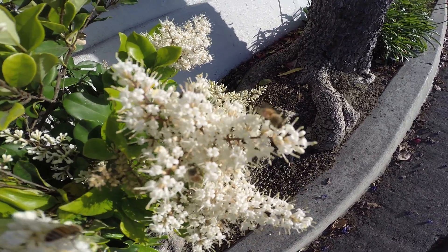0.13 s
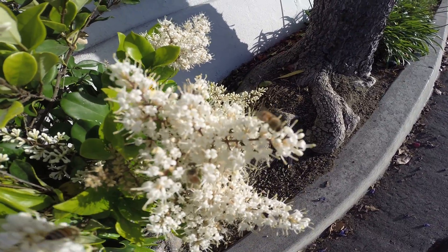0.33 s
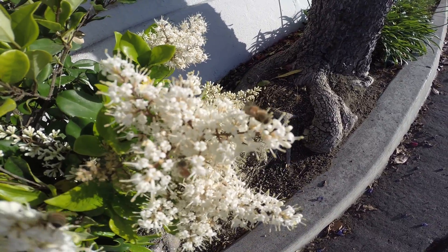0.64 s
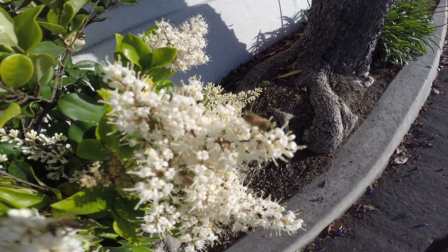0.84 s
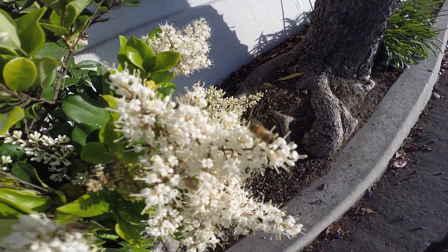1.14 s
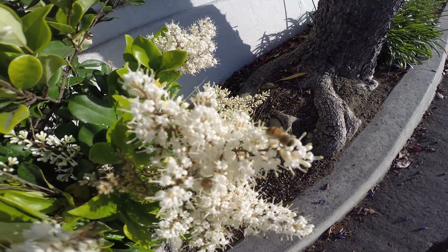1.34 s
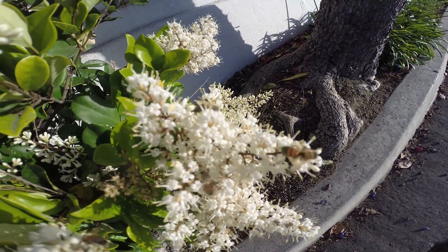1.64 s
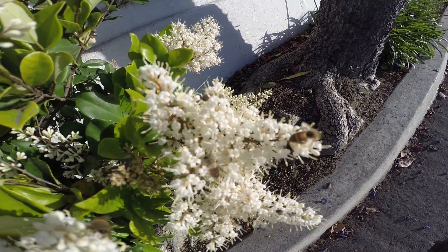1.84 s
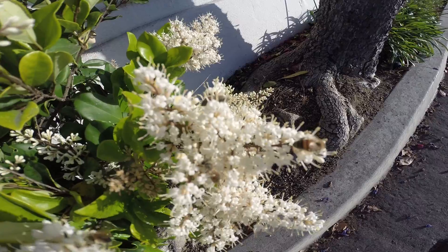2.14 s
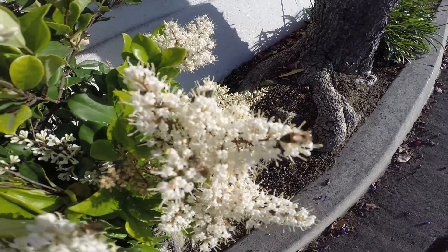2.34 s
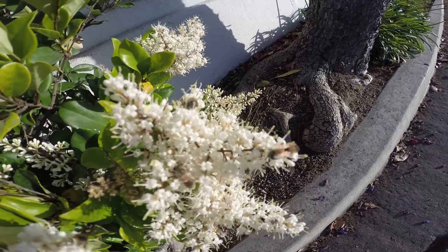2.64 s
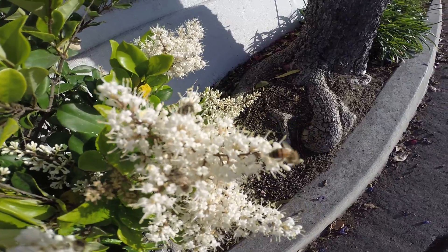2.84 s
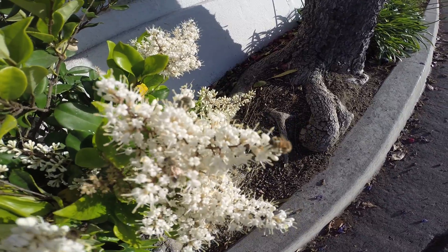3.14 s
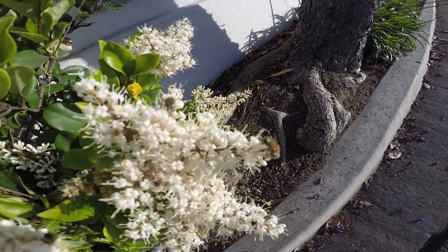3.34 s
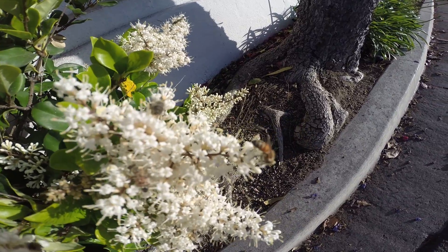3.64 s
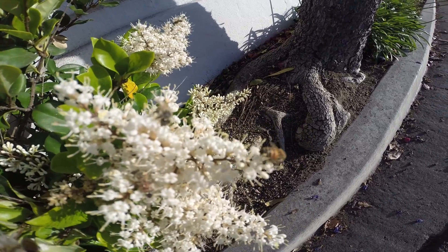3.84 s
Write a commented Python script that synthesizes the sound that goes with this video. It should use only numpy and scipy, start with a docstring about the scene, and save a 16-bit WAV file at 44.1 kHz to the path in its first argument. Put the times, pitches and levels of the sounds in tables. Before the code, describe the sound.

Wind buffets the microphone in low fluttering gusts outdoors, easing to let a faint bird chirp.

```python
"""Wind: a light, gusty breeze rolls eddies over a microphone port beside a flowering bush.
Each eddy is a soft push and pull of pressure; a low, slow swell of noise lies under them.
A quiet outdoor hush is shaped noise. Leaves rustle as grainy noise and twigs tick as short noise bursts.
Bees buzz as stacks of wingbeat harmonics, and a small far-off bird sings gliding, echoing whistles."""
import sys
import numpy as np
from scipy import signal
from scipy.fft import rfft, irfft
from scipy.io import wavfile

SR = 44100
rng = np.random.default_rng(int(sys.argv[2]) if len(sys.argv) > 2 else 0)


def log_audio(samples):
    """Write samples as a 16-bit WAV file to the path given in sys.argv[1]."""
    # one column per channel
    frames = np.atleast_2d(samples).T
    # limit to full scale, then quantise
    limited = np.clip(frames, -1, 1)
    pcm = np.round(limited * 32767).astype(np.int16)
    wavfile.write(sys.argv[1], SR, pcm)


N = 176400
TIME = np.arange(N) / SR  # seconds


def from_db(db):
    """Turn decibels into a gain."""
    return 10 ** (np.asarray(db) / 20)


def rms_one(x):
    """Scale a signal to an rms of 1."""
    return x / np.sqrt(np.mean(x ** 2) + 1e-20)


def filtered(x, hz, kind, order=2):
    """Keep the low, high or middle part of a sound with a Butterworth filter."""
    safe_hz = np.clip(hz, 10, .45 * SR)
    return signal.sosfilt(signal.butter(order, safe_hz, kind, fs=SR, output="sos"), x)


def drift(rate_hz):
    """Wander at random with a spread of 1: noise without its parts faster than rate_hz."""
    noise = rng.standard_normal(N + SR)
    return rms_one(filtered(noise, rate_hz, "low")[SR:])  # skip the filter's start-up


def coloured(spectrum):
    """Noise of rms 1, made by weighting the frequencies of white noise."""
    table_hz, table_db = np.transpose(spectrum)
    bin_hz = np.arange(N // 2 + 1) * SR / N
    bin_db = np.interp(np.log(bin_hz + 1), np.log(table_hz), table_db)
    return rms_one(irfft(rfft(rng.standard_normal(N)) * from_db(bin_db), N))


def arch(start, length):
    """A level that swells and fades like half a sine wave."""
    return np.sin(np.pi * np.clip((TIME - start) / length, 0, 1))


EDDY_LENGTH, EDDY_TWIST = 1.2, 0.66  # radians: how long an eddy swings; spread of its unevenness
MOST_EDDIES = 900


def eddies(rows):
    """Each passing eddy pushes, then pulls, never quite evenly; rows are t/s, level/dB, f/Hz."""
    out = np.zeros(N)
    twists = EDDY_TWIST * rng.standard_normal(size=MOST_EDDIES)
    for (s, db, hz), twist in zip(rows, twists):
        first, last = int((s - 2 / hz) * SR), int((s + 2 / hz) * SR)
        near = slice(max(first, 0), max(last, 0))
        angle = 2 * np.pi * hz * (TIME[near] - s)
        swing = np.sin(angle + twist) / np.sin(1)
        fade = np.cosh(1 / EDDY_LENGTH) / np.cosh(angle / EDDY_LENGTH)
        out[near] -= from_db(db) * swing * fade
    return out


# strength of the wind at the port, before trim and scatter: t/s, level/dB
WIND_LEVEL = [(0, -11), (.05, -39.5), (.11, -22.5), (.13, -20), (.225, -22), (.255, -35.5), (.32, -25.5),
              (.39, -33), (.43, -46), (.475, -21.5), (.51, -35), (.57, -39), (.73, -28.5), (.82, -34.5),
              (.95, -33), (1.01, -47), (1.09, -30.5), (1.22, -28), (1.3, -29.5), (1.37, -24.5),
              (1.45, -19.5), (1.505, -35.5), (1.57, -22.5), (1.68, -30.5), (1.725, -41), (1.81, -28),
              (1.93, -27), (1.98, -34), (2.02, -27.5), (2.12, -31), (2.26, -28.5), (2.305, -46),
              (2.36, -39), (2.44, -27), (2.47, -36), (2.54, -26.5), (2.64, -36.5), (2.76, -33.5),
              (2.85, -47), (2.99, -36), (3.05, -41.5), (3.11, -32.5), (3.33, -30.5), (3.39, -40),
              (3.51, -55), (3.6, -36), (3.69, -60), (3.94, -50.5), (4, -29)]
# centre pitch of the random eddies, before scatter: t/s, f/Hz
EDDY_PITCH = [(0, 121.7), (.09, 94.34), (.18, 135.9), (.3, 105), (.42, 94.56), (.48, 173.9), (.56, 79.07),
              (.72, 125.2), (.9, 80.34), (1.08, 90.13), (1.26, 125), (1.34, 203.1), (1.47, 205.5),
              (1.55, 165), (1.65, 214.5), (1.73, 115.4), (1.8, 149.9), (1.94, 164.9), (2.15, 130),
              (2.26, 148.9), (2.4, 100.3), (2.56, 115.3), (2.8, 71.4), (3.05, 88.08), (3.3, 124.5),
              (3.6, 69.68), (4, 74.95)]
# the strongest single eddies, level before the port filter: t/s, level/dB, f/Hz
STRONG_EDDIES = [(.01,-23,186), (.043,-20,158), (.052,-24.5,220), (0.06,-19.5,112), (.071,-22,147),
                 (0.132,-18.5,216), (.135,-20.5,290), (0.146,-18,122), (.161,-18.5,229), (0.179,-16.5,74.6),
                 (0.186,-20,230), (.194,-18,205), (.208,-22,91), (.226,-18.5,362), (.227,-13,127),
                 (0.321,-20.5,148), (.464,-23.5,128), (.476,-24,178), (.735,-28.5,189.8), (0.763,-27.5,105),
                 (1.133,-26.5,145.3), (1.216,-19,125.3), (1.23,-18,155), (1.247,-24,163), (1.271,-17,105),
                 (1.301,-22.5,165.3), (1.318,-19.5,186), (1.324,-21.5,282), (1.363,-16.5,235.5),
                 (1.37,-16,255), (1.388,-17,199), (1.406,-24.5,296), (1.415,-13,160), (1.432,-18.5,220),
                 (1.443,-16,200), (1.455,-28.5,320), (1.472,-19,248.4), (1.481,-33,373), (1.49,-18.5,270),
                 (1.527,-19.5,192), (1.561,-15,165), (1.573,-14.5,122), (1.59,-19,191), (1.6,-27,268),
                 (1.624,-23,260), (1.631,-30,299.3), (1.804,-26.5,193), (1.841,-22,121.7),
                 (1.861,-24,125.9), (1.912,-17.5,149), (1.919,-17,223.7), (1.967,-26,200.7),
                 (2.02,-25,134.2), (2.05,-23,204.3), (2.156,-23,151.6), (2.216,-20,114.7),
                 (2.251,-23.5,195), (2.329,-16.5,164.8), (2.378,-28,135), (2.436,-20,125),
                 (2.524,-25.5,135), (2.585,-26,138.9), (2.676,-23.5,109.7), (2.705,-25.5,79.6),
                 (2.758,-25,98.7), (2.802,-30,84), (2.988,-34,104.7), (3.103,-29,93.2), (3.19,-29,160.3),
                 (3.333,-23,122)]
EDDIES_PER_S, MEAN_EDDY_HZ = 85, 128.85  # this rate holds at this pitch; shorter eddies follow faster
EDDY_TRIM_DB, EDDY_SCATTER_DB, EDDY_SIZE_SCATTER = -0.5, 3.5, 0.04  # size scatter: in log pitch
CLEAR_S = .006  # a strong eddy sweeps the small ones aside this far before and after its centre
MEAN_WIND_DB = -36.5
SWELL_HZ, SWELL_DB, SWELL_FOLLOWS = 56.4, -4, 0.9  # broad eddies; follows: dB per dB of wind
PORT_LOW_HZ, PORT_HIGH_HZ = 33.2, 1020  # low cut for the swell; high cut for all the wind


def wind():
    """Random eddies follow the wind in strength and pitch, with strong eddies and a slow swell."""
    level = np.interp(TIME, *np.transpose(WIND_LEVEL))
    pitch = np.interp(TIME, *np.transpose(EDDY_PITCH))

    # count the eddies gone by, and jitter the turn at which each one passes
    passed = np.cumsum(EDDIES_PER_S * pitch / MEAN_EDDY_HZ) / SR
    chance = rng.standard_normal(size=(MOST_EDDIES, 3))
    turns = np.arange(MOST_EDDIES) + .4 * chance[:, 0]
    keep = (turns > 0) & (turns < passed[-1])
    at = np.searchsorted(passed, turns[keep])
    chance = np.clip(chance[keep], -1.7, 1.7)
    db = level[at] + EDDY_TRIM_DB + EDDY_SCATTER_DB * chance[:, 1]
    hz = pitch[at] * np.exp(EDDY_SIZE_SCATTER * chance[:, 2])

    gaps = abs(at[:, None] / SR - np.array(STRONG_EDDIES)[:, 0])
    clear = gaps.min(axis=1) > CLEAR_S
    small = eddies(zip(at[clear] / SR, db[clear], hz[clear]))
    strong = eddies(STRONG_EDDIES)

    swell_db = MEAN_WIND_DB + SWELL_DB + SWELL_FOLLOWS * (level - MEAN_WIND_DB)
    swell = rms_one(filtered(drift(SWELL_HZ), PORT_LOW_HZ, "high")) * from_db(swell_db)
    return filtered(small + strong + swell, PORT_HIGH_HZ, "low")


# tone of the outdoor hush: f/Hz, relative level/dB (per Hz)
HUSH_TONE = [(30, -0.5), (110, 2.5), (250, -13), (500, -16.5), (1000, -19.5), (2000, -24), (3500, -28),
             (6000, -33.5), (11000, -41.5), (15000, -51.5)]
HUSH_DB = -50.5


def hush():
    """Steady outdoor noise, strongest in the bass and weaker toward the treble."""
    return from_db(HUSH_DB) * coloured(HUSH_TONE)


# leaves brushing: t/s, length/s, level/dB
RUSTLES = [(.5, 0.43, -67.5), (2.327, 0.16, -64), (2.8, 0.048, -63), (2.88, 0.093, -67.5),
           (3.038, 0.25, -67), (3.828, 0.092, -68), (3.91, 0.059, -65)]
# tone of the leaves: f/Hz, relative level/dB (per Hz)
LEAF_TONE = [(1000, -8), (2500, 4), (4500, 4.5), (9000, -5.5), (15000, -11)]
# twigs ticking, relative level before gain and filter: t/s, level/dB, centre f/Hz
TICKS = [(0.606, -47, 5000), (1.826, -65, 11000), (3.931, -57, 8000), (3.957, -57, 7500)]
GRAIN_DB, GRAIN_HZ = 2.5, 300  # spread of the level flicker, and its top rate
TICK_DECAY_S = 0.002


def leaves():
    """Brushing leaves are noise with a flickering level; twigs tick as fast-dying bands of noise."""
    grains = rms_one(coloured(LEAF_TONE) * from_db(GRAIN_DB * drift(GRAIN_HZ)))
    out = grains * sum(from_db(db) * arch(s, length) for s, length, db in RUSTLES)
    for s, db, hz in TICKS:
        decay = np.exp(-np.minimum(abs(TIME - s) / TICK_DECAY_S, 20))
        snap = rng.standard_normal(N) * (TIME >= s) * decay
        out += 2 * from_db(db) * filtered(snap, [hz / 1.22, hz * 1.22], "band")
    return out


# swells of buzzing as a bee turns: t/s, length/s, strongest harmonic's level/dB, its number
BEE_SWELLS = [(0.502, 0.12, -59.5, 5), (0.623, 0.17, -59, 5), (0.701, 0.23, -53, 2), (0.86, 0.47, -62.5, 2),
              (0.735, 0.081, -66, 4), (0.82, .085, -63, 4), (3.35, 0.79, -63, 1), (3.78, 0.19, -62.5, 2)]
# wingbeat of a weaving bee, before waver: t/s, f/Hz
WINGBEAT = [(.55, 221.3), (.61, 213.4), (.68, 222.2), (.73, 211.7), (.81, 218.6), (.85, 230.5),
            (.91, 213.3), (1.02, 234.5), (1.15, 223.7)]
BEE_WAVER, BEE_WAVER_HZ = 0.00613, 30.8  # spread as a fraction of pitch; top rate
BEE_FALL_DB = 12.5  # loss one harmonic away from the strongest


def bees():
    """A weaving wingbeat; in each swell the harmonics fall away on both sides of the strongest."""
    hz = np.interp(TIME, *np.transpose(WINGBEAT)) * (1 + BEE_WAVER * drift(BEE_WAVER_HZ))
    phase = 2 * np.pi * np.cumsum(hz) / SR
    out = np.zeros(N)
    for s, length, db, strongest in BEE_SWELLS:
        buzz = np.zeros(N)
        for k in range(1, 9):
            fall_db = BEE_FALL_DB * np.sqrt(abs(k - round(strongest)))
            buzz += from_db(-fall_db) * np.sin(k * phase)
        out += from_db(db) * arch(s, length) * buzz
    return out


# bird notes, without echo or waver: t/s, length/s, start f/Hz, end f/Hz, level/dB
NOTES = [(2.02, 0.06, 4173, 4500, -70), (2.157, .1, 3920, 4120, -72), (2.35, 0.12, 4228, 3800, -70),
         (2.92, 0.062, 4050, 3300, -69), (3.025, 0.035, 4286, 3640, -72), (3.065, 0.04, 4000, 2980, -67.5),
         (3.228, 0.05, 4600, 3650, -66.5), (3.258, 0.08, 3680, 3040, -62), (3.378, 0.04, 2830, 2640, -64.5),
         (3.5, 0.041, 2750, 2800, -68), (3.63, 0.045, 4400, 3600, -71), (3.66, 0.05, 3740, 3060, -63.5),
         (3.738, 0.072, 3380, 3080, -65), (3.964, 0.063, 2486, 2930, -65)]
BIRD_WAVER, BIRD_WAVER_HZ = .012, 133.0  # spread as a fraction of pitch; top rate
BIRD_ECHO_DB, BIRD_ECHO_S = -6, 0.035  # echo gain; decay time


def bird():
    """Thin gliding whistles, blurred by echoes from walls and trees."""
    song = np.zeros(N)
    waver = 1 + BIRD_WAVER * drift(BIRD_WAVER_HZ)
    for s, length, start_hz, end_hz, db in NOTES:
        hz = np.interp(TIME, [s, s + length], [start_hz, end_hz]) * waver
        song += from_db(db) * arch(s, length) * np.sin(2 * np.pi * np.cumsum(hz) / SR)
    echo = rng.standard_normal(N) * np.exp(-TIME / BIRD_ECHO_S)
    echo /= np.linalg.norm(echo)
    return song + from_db(BIRD_ECHO_DB) * signal.fftconvolve(song, echo)[:N]


def scene():
    """Wind on the port in front of the quiet garden, as one channel."""
    return (wind() + hush() + leaves() + bees() + bird())[None]


CUTOFF_HZ = 15200


def record(dry):
    """Cut the highest treble steeply with an elliptic filter."""
    # order 10, 0.1 dB ripple below the cutoff, 80 dB loss above
    top_cut = signal.ellip(10, .1, 80, CUTOFF_HZ, fs=SR, output="sos")
    return signal.sosfilt(top_cut, dry)


dry = scene()
out = record(dry)
log_audio(out)
```